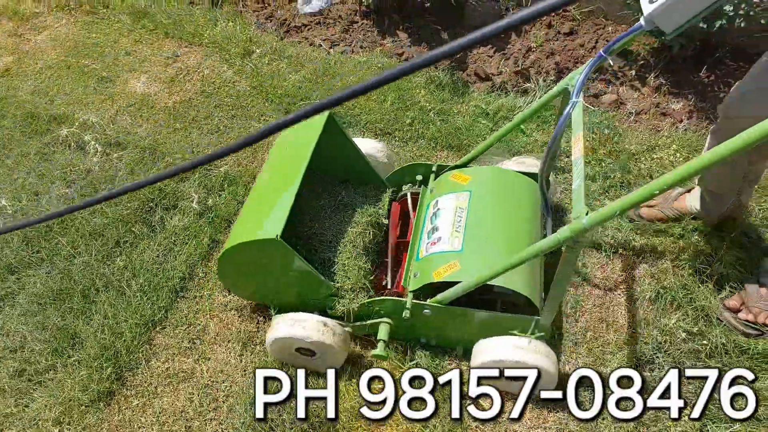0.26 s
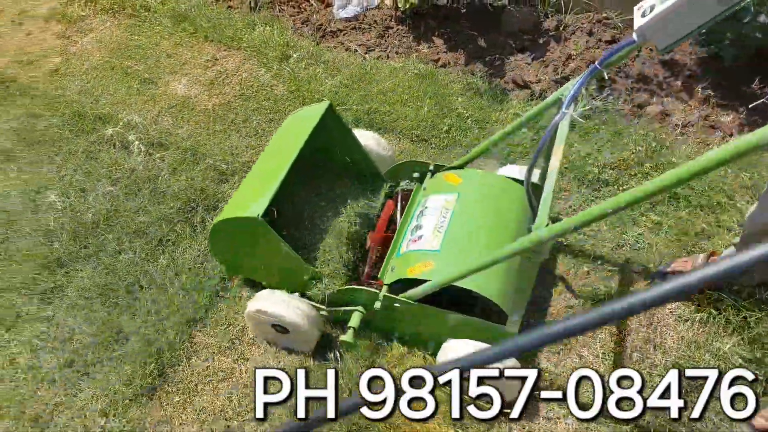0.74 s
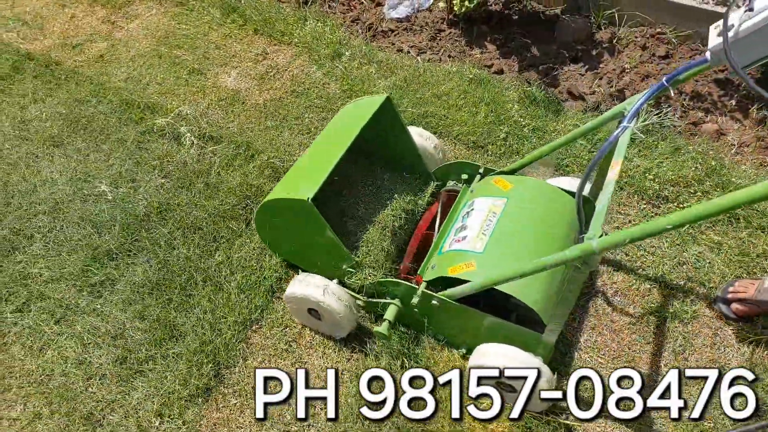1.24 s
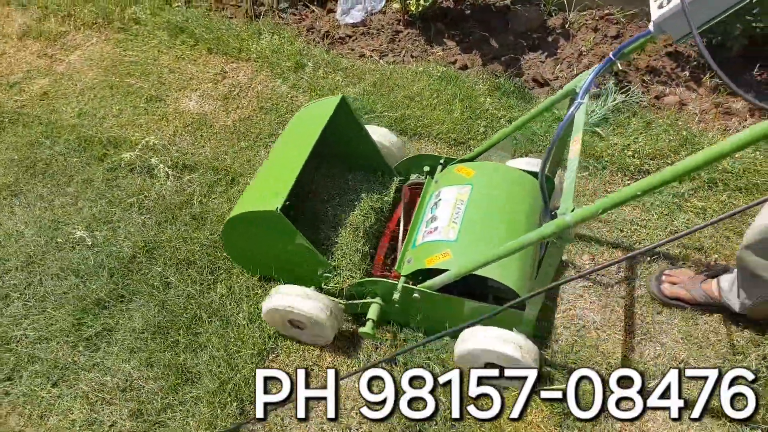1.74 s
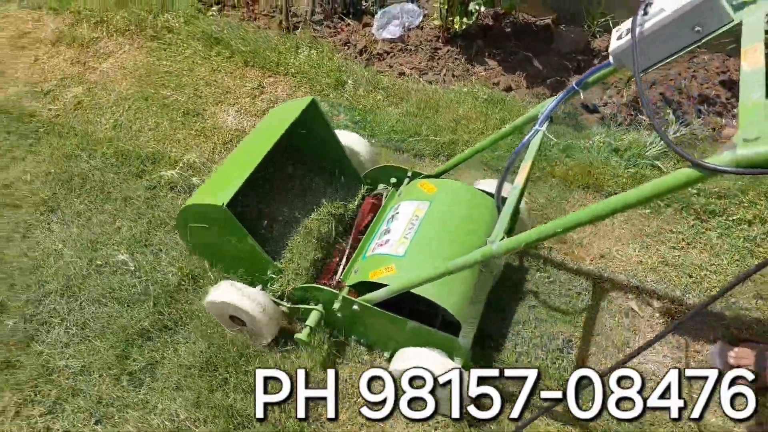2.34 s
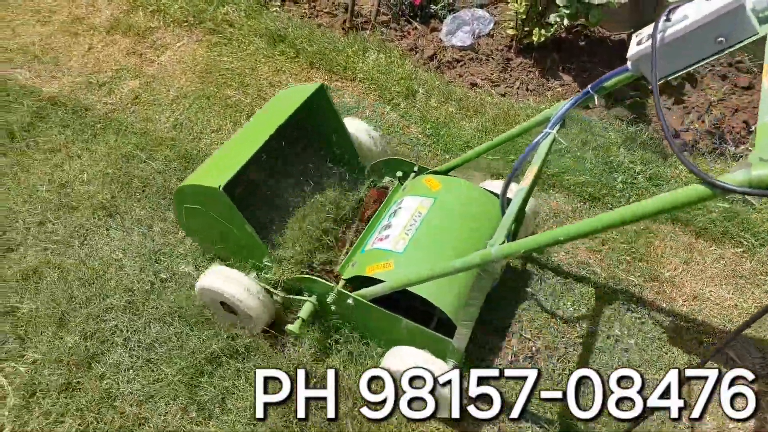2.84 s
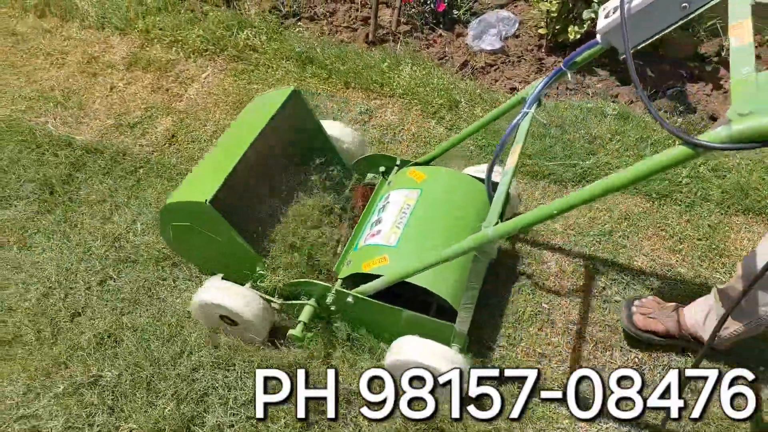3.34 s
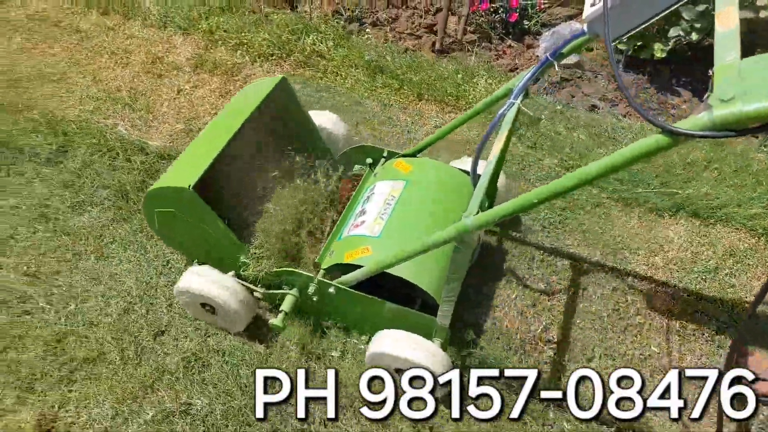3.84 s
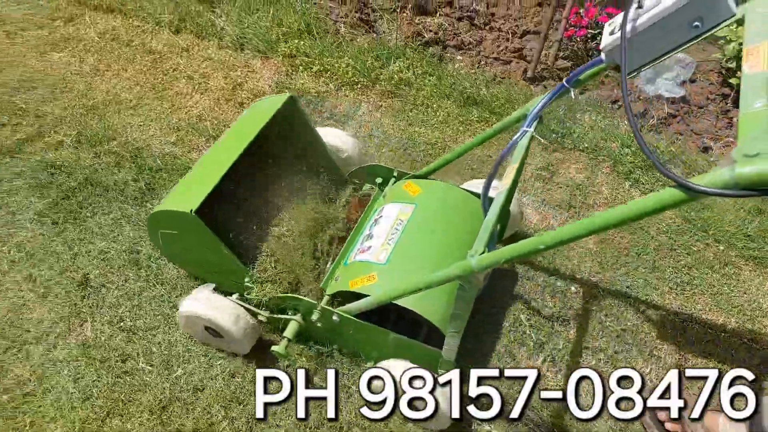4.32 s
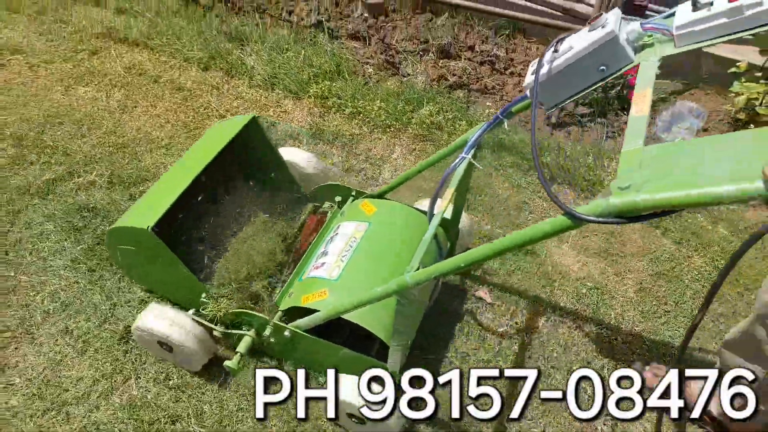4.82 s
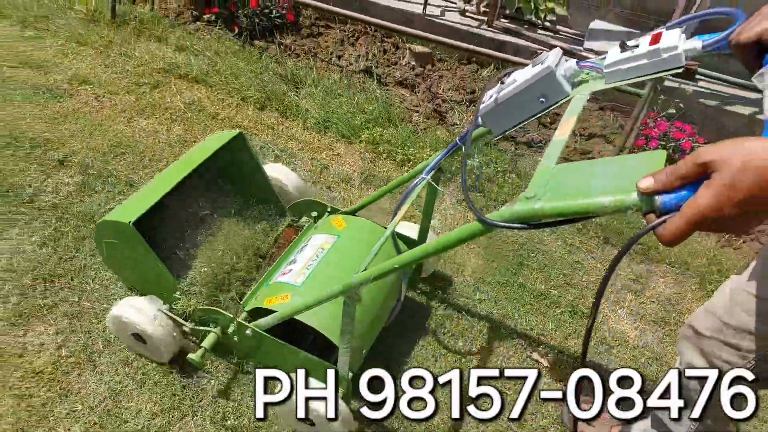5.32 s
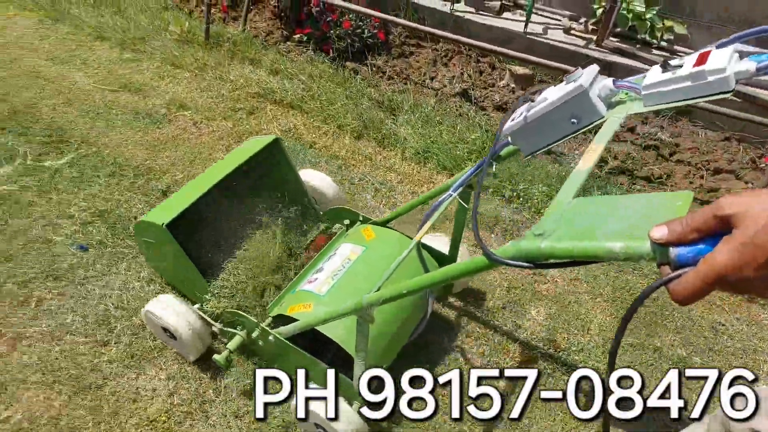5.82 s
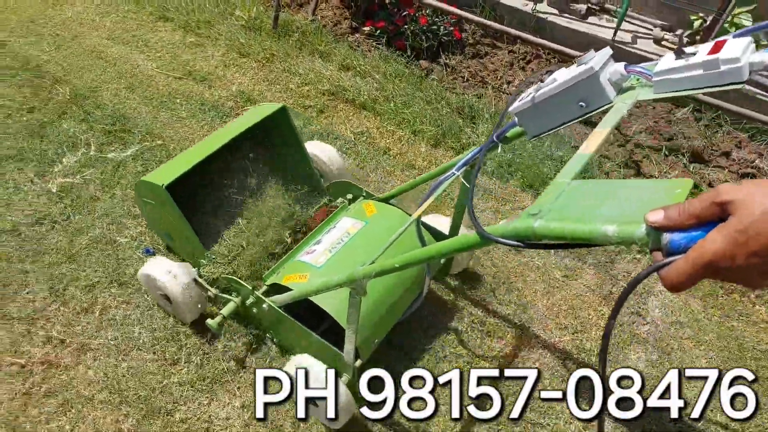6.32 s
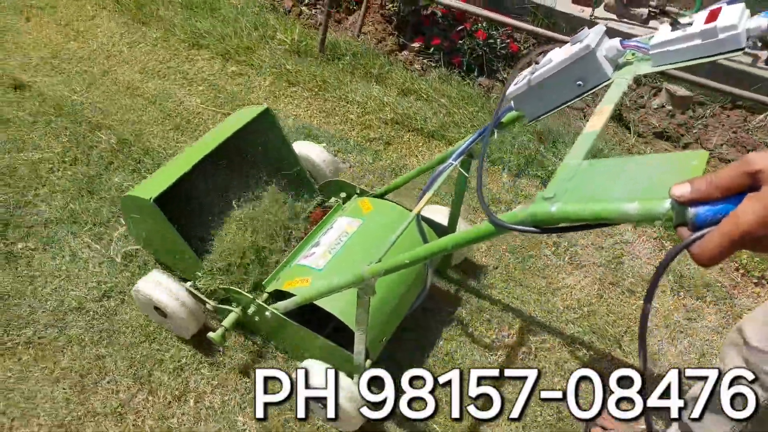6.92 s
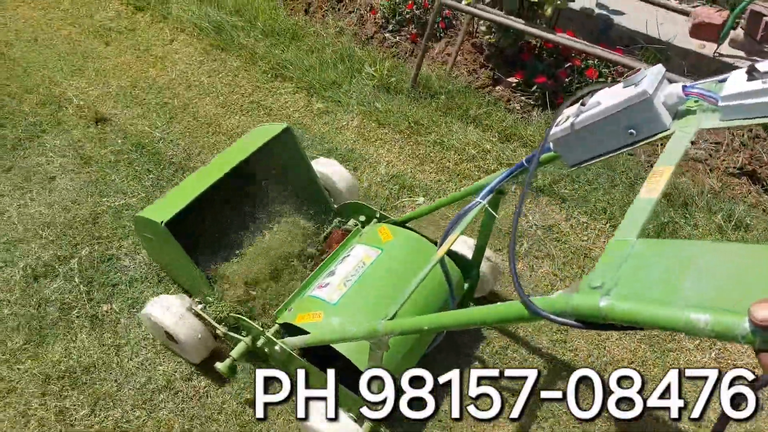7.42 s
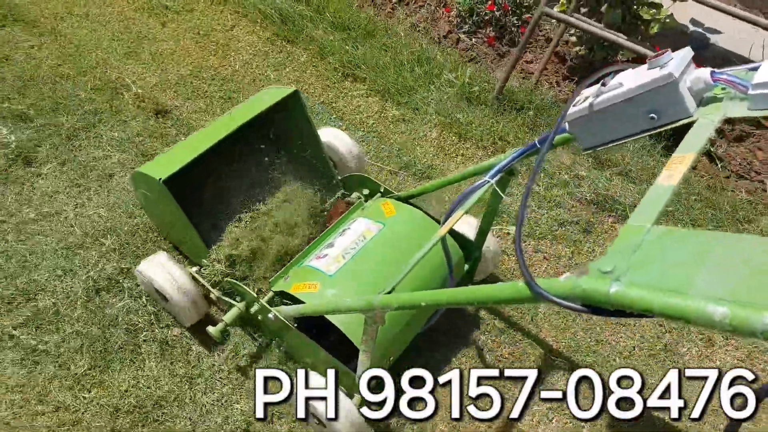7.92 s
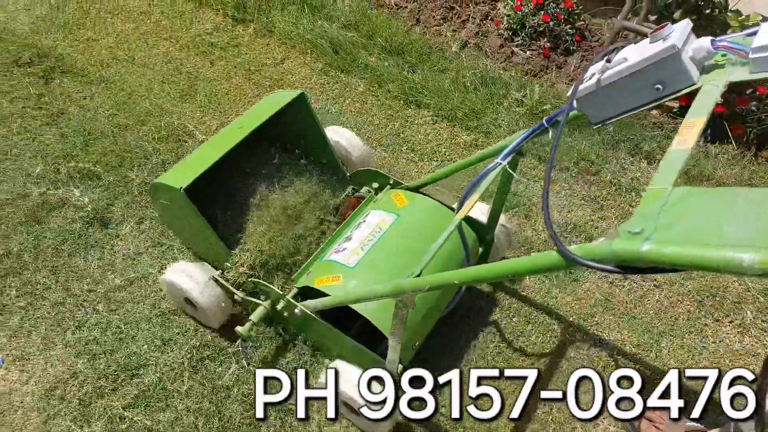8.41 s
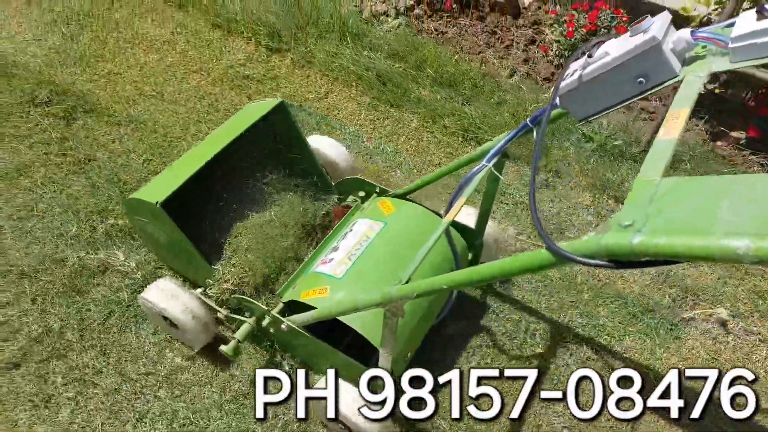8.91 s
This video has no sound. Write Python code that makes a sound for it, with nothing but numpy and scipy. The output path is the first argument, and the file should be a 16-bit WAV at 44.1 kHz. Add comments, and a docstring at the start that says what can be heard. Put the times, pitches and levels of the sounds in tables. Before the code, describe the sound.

Close up, the spinning blades of an electric reel mower hiss, tick and squeal above its droning, rattling body as it cuts a lawn.

```python
"""A bright, whirring hiss over a hum: an electric cylinder mower cutting a lawn, heard from close by.
The reel turns ten times a second, so the drive forces a periodic drone and rattle from the body.
Friction between blades and bed knife hisses, ticks and squeals; clippings patter into the catcher.
The reel slows a little under load, the squeal eases midway, and a twig-like snap follows.
The two-port microphone moves from beside the mower to behind its handle."""
import sys
import numpy as np
from scipy.fft import rfft, irfft, next_fast_len
from scipy.io import wavfile
from scipy.ndimage import uniform_filter1d, map_coordinates

SR = 44100
rng = np.random.default_rng(int(sys.argv[2]) if len(sys.argv) > 2 else 0)


def int16_out(signal):
    """Quantize to a 16-bit WAV file."""
    q = np.round(np.clip(np.atleast_2d(signal).T, -1, 1) * 32767)
    wavfile.write(sys.argv[1], SR, q.astype(np.int16))


N = 403956


def amp(db):
    """Amplitude ratio of a level in decibels."""
    return 10 ** (np.asarray(db) / 20)


def unit(x):
    """Normalisation to rms 1."""
    return x / np.sqrt(np.mean(x ** 2) + 1e-20)


def along(points, hz):
    """Interpolation of (frequency [Hz], value) points on a logarithmic axis."""
    freqs, values = np.transpose(points)
    return np.interp(np.log(hz + 1), np.log(freqs + 1), values)


def curves(rows):
    """Linear interpolation in time: one value per sample for each later column."""
    times, *columns = np.transpose(rows)
    return [np.interp(np.arange(N) / SR, times, column) for column in columns]


def wobble(rate):
    """Smooth random modulation: a spline through `rate` Gaussian knots a second."""
    knots = rng.standard_normal(int(N * rate / SR) + 4)
    coarse = np.arange(0, N + 16, 16)
    return np.interp(np.arange(N), coarse, map_coordinates(knots, [coarse * rate / SR]))


def bump(offset, sigma):
    """Gaussian envelope of height 1."""
    return np.exp(-.5 * (offset / sigma) ** 2)


def white():
    """White noise, uncorrelated between the two ports."""
    return rng.standard_normal((2, N))


def filtered(x, response):
    """Linear filtering: the spectrum is multiplied by a frequency response."""
    size = next_fast_len(N + SR // 10, True)
    return irfft(rfft(x, size) * response(np.fft.rfftfreq(size, 1 / SR)), size)[..., :N]


def coloured(x, spectrum):
    """Spectral shaping, at rms 1."""
    return unit(filtered(x, lambda hz: amp(along(spectrum, hz))))


def resonate(x, modes):
    """Modal superposition: x excites a sum of Lorentzian peaks, at rms 1."""
    def response(hz):
        return sum(amp(db) / (1 + ((hz - centre) / (0.53 * width)) ** 2) for centre, width, db in modes)
    return unit(filtered(x, response))


def drifting(x, depth=.004, rate=9):
    """Frequency modulation: an uneven reading speed makes the pitch wander."""
    position = np.arange(N) + np.cumsum(depth * wobble(rate))
    return np.array([map_coordinates(port, [position], mode="mirror") for port in x])


def turn_noise(turns, fresh, spiky_db):
    """Cyclostationary noise: a roughness profile recurs each turn; `fresh` is the random power share."""
    size = SR // 10
    knocks = amp(spiky_db * unit(uniform_filter1d(rng.standard_normal(size), size=60, mode="wrap")))
    position, grid = (turns % 1) * size, np.arange(size)
    periodic = np.array([np.interp(position, grid, row) for row in rng.standard_normal((2, size))])
    roughness = np.sqrt(1 - fresh) * unit(periodic) + np.sqrt(fresh) * white()
    return np.interp(position, grid, knocks) * roughness


def harmonics(turns, table):
    """Harmonics of the rotation rate, each slightly unsteady, at rms 1."""
    golden = (np.sqrt(5) - 1) / 2
    total = 0
    for order, db in table:
        # quadratic phases spread the beats between neighbours around the turn
        phase = order * turns + golden * order * order / 2 + 0.069 * wobble(3) + 0.06 * wobble(14)
        total = total + amp(db + 2.47 * wobble(4)) * np.sin(2 * np.pi * phase)
    return unit(total)


def panned(x, pan_db):
    """Level difference: the left port exceeds the right by pan_db."""
    return x * amp(np.array([[1], [-1]]) * pan_db / 2)


def placed(pair, table):
    """Mid-side mixing gives two independent signals a level, balance and correlation."""
    db, pan_db, correlation = curves(table)
    angle = np.arccos(np.clip(correlation, -1, 1)) / 2
    mid, side = pair * np.array([np.cos(angle), np.sin(angle)])
    return amp(db) * panned(np.array([mid + side, mid - side]), pan_db)


def gain_at(place, beside_db, behind_db):
    """Gain by listening position, linear in decibels from beside the mower to behind it."""
    return amp(beside_db + place * (behind_db - beside_db))


# likeness of the two ports (frequency [Hz], coherence [0 to 1])
COHERENCE = [(50, 0.89), (250, 1), (500, 0.58), (1000, 1), (2000, 0.36), (5000, 0.28), (9000, 0),
             (14000, 0.2)]
# their balance at bearing 0.5 (frequency [Hz], left minus right [dB])
BALANCE = [(100, 1.5), (300, -5), (600, 0), (1500, 1.5), (2400, -3), (3400, -1), (4600, -1), (5400, 1),
           (6100, 5.5), (7000, 8), (8500, 2.5), (10500, 2.5), (12500, -3), (15000, -8)]
# its change with bearing (frequency [Hz], slope [dB per unit bearing])
BALANCE_SLOPE = [(1000, 2.5), (2200, -2), (3200, -0.5), (4500, 13.5), (5500, 8), (6500, -21), (10000, -16)]


def ports(pair, place):
    """Spaced receivers: bass is coherent, treble much less; level and delay differences follow place."""
    def mid_side(hz):
        angle = np.arccos(np.clip(along(COHERENCE, hz), -1, 1)) / 2
        return np.array([np.cos(angle), np.sin(angle)])
    mid, side = filtered(pair, mid_side)

    def heard(bearing):
        lead_ms = np.interp(bearing, [0, 1], [.09, .19])  # the left port is nearer

        def response(hz):
            balance_db = along(BALANCE, hz) + (bearing - .5) * along(BALANCE_SLOPE, hz)
            left = amp(balance_db / 2) * np.exp(1j * np.pi * hz * lead_ms / 1000)
            return np.array([left, 1 / left])
        return filtered(np.array([mid + side, mid - side]), response)
    stops = np.linspace(0, 1, 5)
    fades = [np.interp(place, stops, row) for row in np.eye(len(stops))]
    return sum(fade * heard(bearing=0.58 * stop) for stop, fade in zip(stops, fades))


# the motor's mains hum (time [s], level [dB])
MAINS_LEVEL = [(0, -54), (1.2, -48), (9.16, -44.5)]


def motor_hum(mains_hz=50):
    """Magnetic excitation: the motor hums at twice the mains frequency."""
    tone = np.sin(2 * np.pi * 2 * mains_hz * np.arange(N) / SR)
    return amp(curves(MAINS_LEVEL)[0] + wobble(6)) * unit(tone)


# low shaking of the chassis (frequency [Hz], relative density [dB])
RUMBLE_SPECTRUM = [(20, -44), (32, -33), (50, -21), (68, -12.5), (85, -21), (112, -18), (138, 0), (148, -6),
                   (170, -14.5), (220, -8), (300, -57)]
# brief extra shaking (time [s], added amplitude relative to the steady shaking [dB])
CHASSIS_JUDDERS = [(3.32, -1), (5.97, -1), (6.87, -7), (7.33, -5)]


def chassis_rumble(place, hum_db):
    """Forced vibration: the drive shakes the chassis, more strongly while its hum sinks."""
    t = np.arange(N) / SR
    judder = 1 + sum(amp(db) * bump(t - at, sigma=0.045) for at, db in CHASSIS_JUDDERS)
    shake = amp(-0.36 * (hum_db - hum_db.mean()) + 1.2 * wobble(2.96))
    return gain_at(place, -41, -39.5) * judder * shake * coloured(white(), RUMBLE_SPECTRUM)


# upper and lower frame modes (frequency [Hz], bandwidth [Hz], relative level [dB])
FRAME_MODES = [(858, 28, -8), (907, 38, 2.5), (1015, 21, -0.5), (1120, 55, -3)]
LOW_MODES = [(666, 45, 2), (700, 60, -1), (820, 44, -1)]
# tones in the frame, and a thin whine below them (order [per turn], relative level [dB])
FRAME_HARMONICS = [(90, -2), (91, -2), (92, 0)]
WHINE_HARMONICS = [(84, 0)]
# envelopes of the upper modes, lower modes and whine (time [s], level [dB])
FRAME_ENVELOPE = [(0, -38), (1, -38), (1.3, -42.5), (2.4, -44), (2.8, -36), (3.6, -39.5), (4.8, -34.5),
                  (5.6, -37), (6.6, -33.5), (7.6, -34.5), (9.16, -36.5)]
LOW_ENVELOPE = [(0, -50), (1.2, -48), (1.6, -34), (2, -40), (2.5, -44), (4.5, -48), (9.16, -56)]
WHINE_ENVELOPE = [(0, -48), (2.2, -44), (2.8, -40), (4, -45), (5.5, -49), (9.16, -53.5)]


def frame_ring(turns):
    """Resonance: the motor shaft beats on the frame; the ring sinks briefly, then returns with a whine."""
    shaft_turns = 2.49 * turns
    beat = amp(3 * np.cos(np.pi * shaft_turns) ** 8)
    jolt = amp(4.5 * bump(turns % 1 - 0.52, sigma=0.13))  # hardest halfway through each turn
    ring = resonate(beat * jolt * turn_noise(turns, fresh=0.69, spiky_db=0), FRAME_MODES)
    upper = amp(curves(FRAME_ENVELOPE)[0]) * (ring + amp(-3.5) * harmonics(turns, FRAME_HARMONICS))
    lower = amp(curves(LOW_ENVELOPE)[0]) * resonate(white(), LOW_MODES)
    whine = amp(curves(WHINE_ENVELOPE)[0]) * harmonics(turns, WHINE_HARMONICS)
    return upper + lower + whine


# three noise bands of the shaken body (frequency [Hz], relative density [dB])
DRONE_SPECTRUM = [(140, -27), (200, -21), (230, 2.5), (300, 1), (345, -4.5), (390, -29), (2000, -70)]
CLATTER_SPECTRUM = [(200, -47), (420, 0), (600, 0), (760, -1), (1030, -0.5), (1250, -2.5), (1600, -3.5),
                    (2300, -11), (3200, -25), (6000, -49)]
BUZZ_SPECTRUM = [(280, -29), (350, -2), (420, -2.5), (450, -5), (520, -5.5), (620, -18), (2000, -60)]
# vibration of the casing (time [s], relative drone level [dB], relative buzz level [dB])
CASING_ENVELOPES = [(0, -27, -36.5), (1.05, -28.5, -33), (1.75, -31.5, -41), (2.55, -29.5, -33),
                    (3.55, -29.5, -37), (4.2, -30, -31.5), (4.8, -26.5, -33), (6.1, -28.5, -31.5),
                    (6.75, -27.5, -34), (7.15, -25, -32), (7.6, -27, -30), (8.5, -28, -35),
                    (9.16, -30, -33.5)]


def casing_rattle(turns, swell_db):
    """Broadband forced vibration: the drive rattles the casing, more roughly the louder it drones."""
    drone_db, buzz_db = curves(CASING_ENVELOPES)
    roughening_db = 0.14 * (drone_db - drone_db.mean())
    drone = coloured(turn_noise(turns, fresh=0.74, spiky_db=1.5), DRONE_SPECTRUM)
    clatter_db = -30.5 + swell_db + 0.4 * wobble(3)
    clatter = coloured(turn_noise(turns, fresh=0.6, spiky_db=1), CLATTER_SPECTRUM)
    buzz = coloured(turn_noise(turns, fresh=0.64, spiky_db=0.2), BUZZ_SPECTRUM)
    return amp(drone_db - 4 + roughening_db) * drone + amp(clatter_db) * clatter + amp(buzz_db - 5.5) * buzz


# low and high tones of the casing (order [per turn], relative level [dB])
DRONE_HARMONICS = [(19, -52.5), (25, -39), (27, -45), (28, -36.5), (29, -37.5), (30, -34), (33, -41.5),
                   (34, -40)]
BUZZ_HARMONICS = [(36, -41), (37, -42.5), (38, -42), (40, -49.5), (42, -43), (43, -48.5), (48, -42),
                  (50, -49)]


def casing_tones(turns):
    """Periodic forcing: uneven gear teeth drive the casing at harmonics of the turn."""
    drone_db, buzz_db = curves(CASING_ENVELOPES)
    drone = amp(drone_db - 0.95) * harmonics(turns, DRONE_HARMONICS)
    buzz = amp(buzz_db - 0.8) * harmonics(turns, BUZZ_HARMONICS)
    return panned(drone + buzz, pan_db=-1.5)


# hum of the gear teeth (time [s], level [dB])
GEAR_LEVEL = [(0, -27), (.9, -23.5), (2.6, -24), (3.05, -29), (3.6, -30.5), (3.85, -26.5), (4.7, -28),
              (5.1, -27), (5.9, -25.5), (7.2, -25), (8.5, -23), (9.16, -25)]
# its balance (time [s], left minus right [dB])
GEAR_PAN = [(0, 0), (2.5, 2), (3.3, 0.5), (4.3, 0), (5.2, -1.5), (6.2, 8.5), (9.16, 0)]


def gear_hum(turns, hum_db, teeth=24):
    """Gear-mesh tone: eccentricity of the drive modulates its amplitude once a turn."""
    mesh = unit(np.sin(2 * np.pi * teeth * turns))
    throb_db = 0.9 * wobble(9) + 0.7 * np.cos(2 * np.pi * turns)
    return panned(amp(hum_db + throb_db) * mesh, curves(GEAR_PAN)[0])


# bright noise of clippings and snap (frequency [Hz], relative density [dB])
SPRAY_SPECTRUM = [(2000, -15), (6000, 6.5), (8000, 3), (9500, 1.5), (11000, 5), (12500, 6.5), (14500, 1.5),
                  (15700, -11)]


def clippings(place, pressure_db):
    """Random impacts: cut grass striking the catcher merges into a fluttering noise."""
    patter = white() * amp(wobble(700) + 0.82 * wobble(30))
    return gain_at(place, -33.5, -27) * amp(0.2 * pressure_db) * coloured(patter, SPRAY_SPECTRUM)


# a small snap in the reel (time [s], level [dB])
SNAPS = [(6.015, -18)]


def snap(t60_s=0.086):
    """A damped transient: twig-like noise starts abruptly and decays exponentially."""
    t = np.arange(N) / SR
    envelope = sum(amp(db - 60 * np.abs(t - at) / t60_s) * (t > at) for at, db in SNAPS)
    return envelope * coloured(white(), SPRAY_SPECTRUM)


def rub(turns, centre, sigma, hz, rise_hz, half_band_hz):
    """Stick-slip friction: once a turn a contact slides along the knife as a narrow band of noise."""
    offset = (turns - centre + .5) % 1 - .5
    carrier = 2 * np.pi * np.cumsum(hz + rise_hz * offset) / SR
    a, b = (unit(filtered(white(), lambda f: 1 / (1 + (f / half_band_hz) ** 4))) for _ in range(2))
    # the pitch wanders while the strength stays nearly even
    slip = (a * np.cos(carrier) - b * np.sin(carrier)) / np.sqrt(a * a + b * b + .5)
    return amp(1.1 * wobble(5.9)) * bump(offset, sigma) * unit(slip)


# high spots and nicks on the blades (centre [turns], sigma [turns], frequency [Hz],
# glide [Hz/turn], half bandwidth [Hz], relative level [dB])
SPOT_CONTACTS = [(0.095, 0.047, 4765, 0, 320, -1.8), (.775, 0.043, 4675, 3000, 260, -0.7),
                 (.87, 0.05, 4760, 2500, 260, -3)]
NICK_CONTACTS = [(.093, .024, 4300, -8000, 210, 0), (.76, .022, 4290, -5000, 140, -6)]
# how each set is heard (time [s], level [dB], left minus right [dB], correlation [-1 to 1])
SPOT_MIX = [(0, -27, -7, -0.1), (.8, -20, -6, -0.2), (1.35, -26, -9, -0.1), (1.8, -24, -12, -0.4),
            (2.6, -25, -9, -0.2), (3.4, -23, -15, -0.1), (4.1, -21, -3, -0.5), (4.9, -26, 11, -0.8),
            (5.3, -41, 4, -0.4), (9.16, -33, 2, -0.3)]
NICK_MIX = [(0, -20, -2, 0), (1, -27, -9, 0), (2.6, -32, -11, 0), (3.3, -20, -6, 0.042), (4.3, -28, -6, 0),
            (4.9, -28, 2, 0), (5.45, -21, -1, 0.1), (6.2, -20, 3, -0.6), (7.3, -24, 2, -0.1),
            (8.1, -20.5, -2, 0.033), (9.16, -19.5, -6, 0.1)]
# light touches (centre [turns], sigma [turns], frequency [Hz], glide [Hz/turn], half bandwidth [Hz])
LIGHT_CONTACTS = [(.92, .14, 4990, 50, 30), (.85, .16, 5485, 0, 40)]
# their envelopes (time [s], lower touch level [dB], higher touch level [dB])
LIGHT_ENVELOPES = [(0, -38, -45), (1.7, -36, -43), (2.3, -28, -41), (3.6, -31, -37), (4.1, -29, -29),
                   (4.8, -32, -29.5), (5.6, -40, -29.5), (7, -38, -34), (9.16, -42, -37)]


def scrape(turns):
    """Periodic contact with the knife: high spots rasp, nicks tick and light touches ring higher."""
    spots = sum(amp(db) * rub(turns, *shape) for *shape, db in SPOT_CONTACTS)
    nicks = sum(amp(db) * rub(turns, *shape) for *shape, db in NICK_CONTACTS)
    touches = sum(amp(db) * rub(turns, *shape)
                  for shape, db in zip(LIGHT_CONTACTS, curves(LIGHT_ENVELOPES)))
    return placed(spots, SPOT_MIX) + placed(nicks, NICK_MIX) + touches


# notes of a catching blade (time [s], frequency [Hz], glide [Hz/s], level [dB])
ZING_NOTES = [(.485, 4976, 6000, -25), (.777, 4720, 11000, -28), (.972, 4700, 14000, -27),
              (1.074, 4783, 15000, -31), (1.269, 4685, 5000, -27.5), (2.176, 4960, 0, -25),
              (2.476, 4990, 4000, -25), (2.576, 4900, 0, -23), (2.678, 4960, 2000, -21),
              (2.871, 5000, -6000, -24), (3.072, 5000, -2000, -26), (3.173, 4800, 4000, -28),
              (3.268, 4700, 6000, -26), (3.377, 4988, 0, -25), (3.468, 4730, 8000, -27),
              (3.776, 5060, 0, -24.5), (3.875, 4670, 4000, -26), (3.976, 4940, -2, -21),
              (4.075, 4980, 0, -32), (4.275, 4990, 0, -27.5), (4.375, 4970, 0, -24.5),
              (4.475, 4990, 0, -29)]


def zings(sigma_s=0.0092, jitter_rad=.45):
    """Self-excited vibration: a blade catches the knife and sings a short, nearly pure note."""
    t = np.arange(-SR // 20, SR // 20) / SR
    notes = np.zeros(N, complex)
    for (at, hz, glide, db), phase in zip(ZING_NOTES, rng.random(len(ZING_NOTES))):
        chirp = np.exp(2j * np.pi * (phase + hz * t + glide * t * t / 2))
        start = round(at * SR) - len(t) // 2
        notes[start:start + len(t)] += amp(db) * bump(t, sigma_s) * chirp
    roughened = np.sqrt(2) * np.real(notes * np.exp(1j * jitter_rad * wobble(330)))
    return panned(roughened, curves(SPOT_MIX)[1])


# modes of blades and knife in contact (frequency [Hz], bandwidth [Hz], relative level [dB])
COUPLED_MODES = [(1639, 32, -4.5), (2332, 21, -1.5), (2532, 42, 1), (2697, 100, -5.5), (3395, 42, -0.5),
                 (4316, 160, -1.5), (4685, 120, 0.5), (4940, 55, 5.5), (5530, 22, 5), (6670, 110, -10.5)]
# how hard the blades press, easing midway (time [s], relative load [dB])
CONTACT_LOAD = [(0, -1), (.7, 1), (3.85, 1), (4.5, -2.5), (5.3, -6.5), (7.5, -7.5), (9.16, -3)]


def squeal(turns):
    """Coupled resonance: blades and knife ring together, loudest just after the high spots."""
    load_db, = curves(CONTACT_LOAD)
    pulse_db = 0.94 * np.cos(2 * np.pi * (turns - .93))
    ring = drifting(resonate(white(), COUPLED_MODES))
    return panned(amp(-24.5 + 0.79 * load_db + pulse_db) * ring, pan_db=1)


def blade_pressure(turns, blades=6):
    """Modulation of the contact [dB]: the off-centre reel gives one cycle a turn, each blade another."""
    eccentricity_db = 0.45 * np.cos(2 * np.pi * (turns - .88))
    passing_db = 0.36 * np.cos(2 * np.pi * blades * turns)
    return eccentricity_db + passing_db + 0.4 * wobble(22)


# shearing hiss and a lower, opening rasp (frequency [Hz], relative density [dB])
HISS_SPECTRUM = [(500, -17.5), (1200, -16), (1800, -4), (2500, 0.5), (3100, 1.2), (3600, 0.7), (4200, 2),
                 (5000, 0.5), (5700, 0.5), (6300, -4), (6750, -3.5), (7400, -14.5), (9000, -43),
                 (15000, -29)]
RASP_SPECTRUM = [(1800, -35), (2400, -8), (3400, -5), (4400, -3), (6000, -25)]
# envelope of the rasp (time [s], level [dB])
RASP_ENVELOPE = [(0, -25.5), (.3, -24), (.6, -37), (1.5, -30), (3, -36), (4, -55)]
# modes of the bed knife and of the free blades (frequency [Hz], bandwidth [Hz], relative level [dB])
KNIFE_MODES = [(2033, 80, 1.5), (2237, 39, 0.5), (2353, 28, -1.5), (2446, 58, -1.5)]
BLADE_MODES = [(3953, 42, 1), (4335, 110, -5), (5040, 100, -2), (5233, 150, -2.5), (5400, 43, 2),
               (5766, 130, -2)]


def cutter(turns, place, swell_db, pressure_db):
    """Friction noise: blades shear along the bed knife, hissing and exciting the modes of both."""
    edge = turns + 0.001986 * wobble(14)  # the roughness of each turn never returns at quite the same instant
    hiss = coloured(turn_noise(edge, fresh=0.63, spiky_db=1.16), HISS_SPECTRUM)
    knife = resonate(turn_noise(edge, fresh=0.9, spiky_db=5), KNIFE_MODES)
    blades = drifting(resonate(turn_noise(edge, fresh=0.9, spiky_db=2.5), BLADE_MODES))
    rasp = coloured(white(), RASP_SPECTRUM)
    return (gain_at(place, -22, -21.5) * amp(swell_db + pressure_db) * hiss
            + gain_at(place, -35, -28) * amp(3.9 * swell_db) * knife
            + gain_at(place, -25.5, -27) * amp(1.6 * pressure_db) * blades
            + amp(curves(RASP_ENVELOPE)[0] + pressure_db) * rasp)


# the reel slowing under load (time [s], speed [turns/s])
REEL_SPEED = [(0, 10.058), (2.25, 10.058), (2.5, 9.994)]
# path of the microphone (time [s], place [0 beside the mower, 1 behind the handle])
MICROPHONE_PATH = [(0, 0), (2, 0.21), (4, 0.55), (6, 0.87), (9.16, 0.9)]
# swell of hiss and clatter, which the knife follows more steeply (time [s], level [dB])
CUTTING_SWELL = [(0, -1), (.8, -0.8), (3.7, -0.5), (5, -1.5), (6.2, 0), (9.16, 0.2)]


def scene():
    """Superposition: the sources share one reel rotation and one moving listening point."""
    turns = np.cumsum(curves(REEL_SPEED)[0]) / SR
    place, hum_db, swell_db = (curves(table)[0] for table in (MICROPHONE_PATH, GEAR_LEVEL, CUTTING_SWELL))
    body = chassis_rumble(place, hum_db) + casing_rattle(turns, swell_db) + frame_ring(turns)
    pressure_db = blade_pressure(turns)
    reel = cutter(turns, place, swell_db, pressure_db) + squeal(turns)
    debris = clippings(place, pressure_db) + snap()
    drive = gear_hum(turns, hum_db) + casing_tones(turns) + motor_hum()
    return drive + scrape(turns) + zings() + ports(body + reel + debris, place)


def record(dry):
    """Band limiting: an ideal low-pass filter removes everything above 15.6 kHz."""
    return filtered(dry, lambda hz: hz < 15600)


dry = scene()
out = record(dry)
int16_out(out)
```